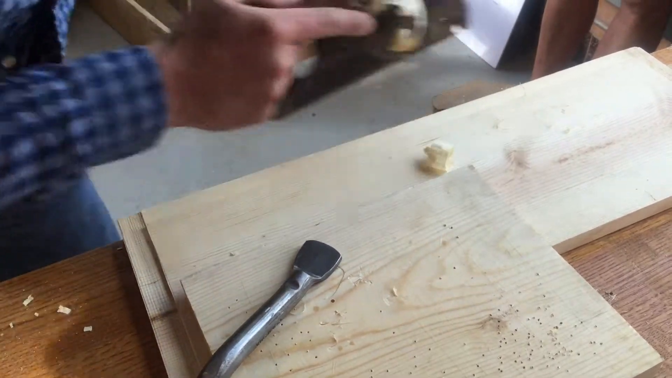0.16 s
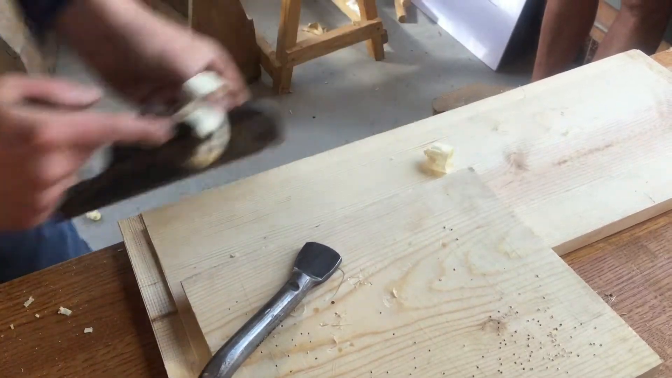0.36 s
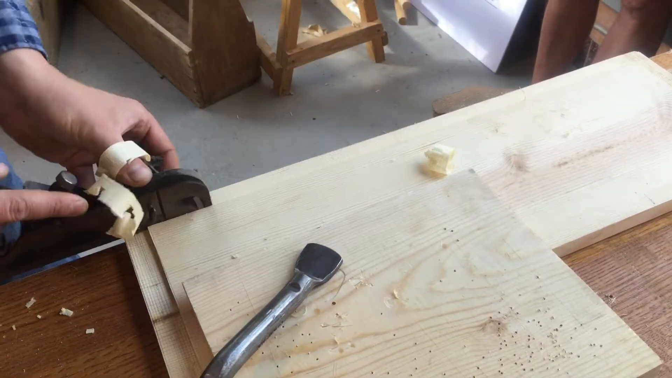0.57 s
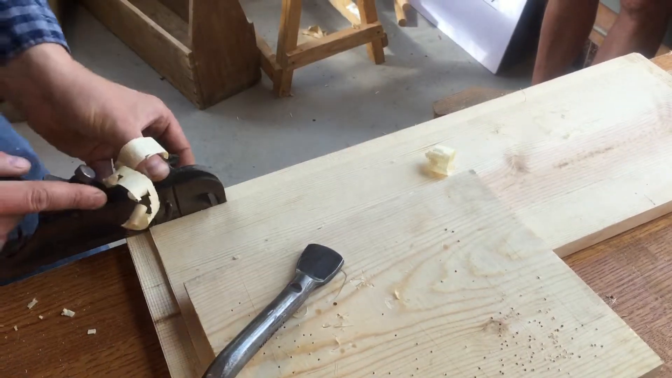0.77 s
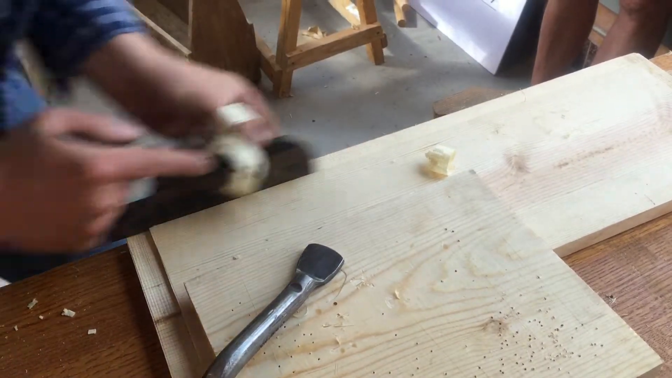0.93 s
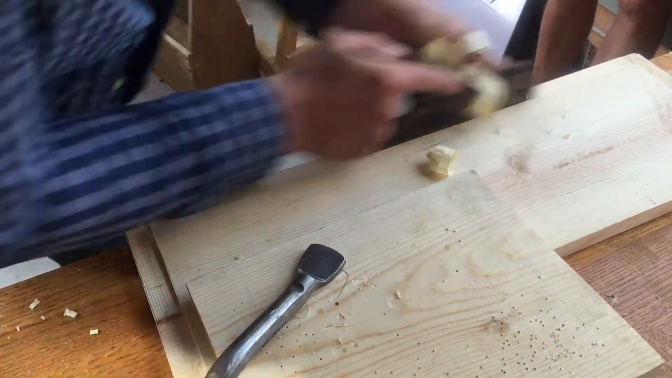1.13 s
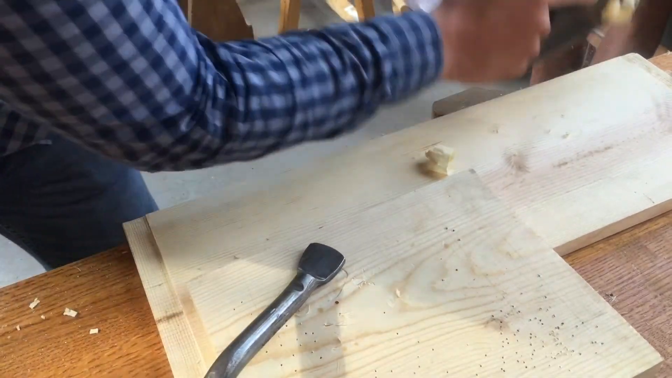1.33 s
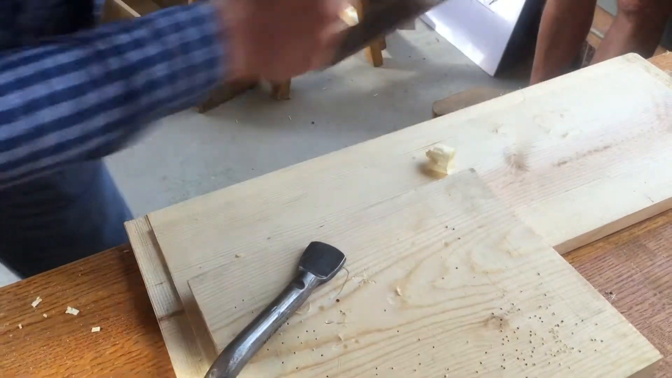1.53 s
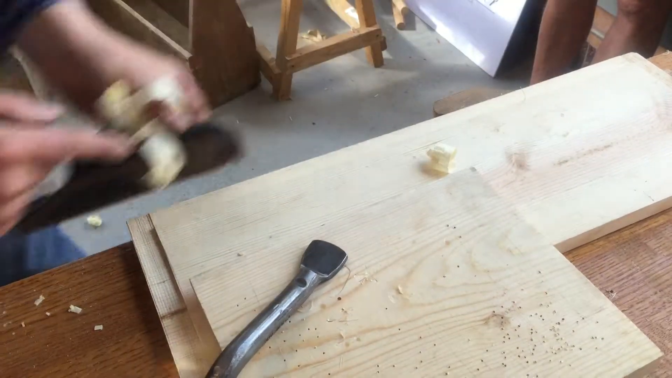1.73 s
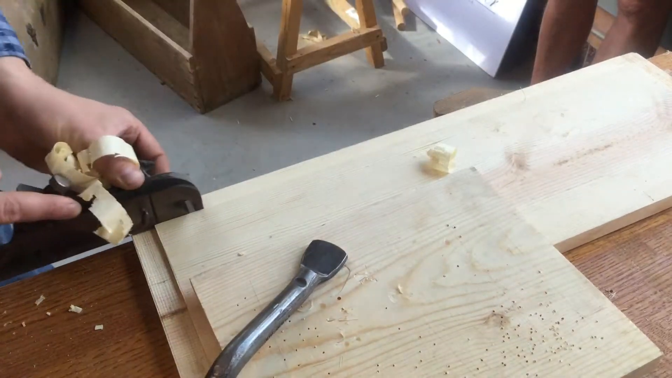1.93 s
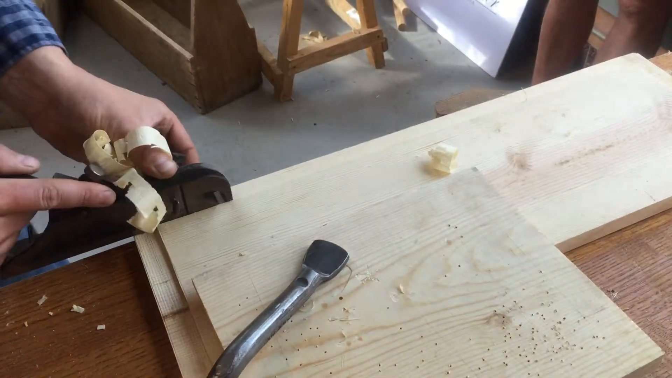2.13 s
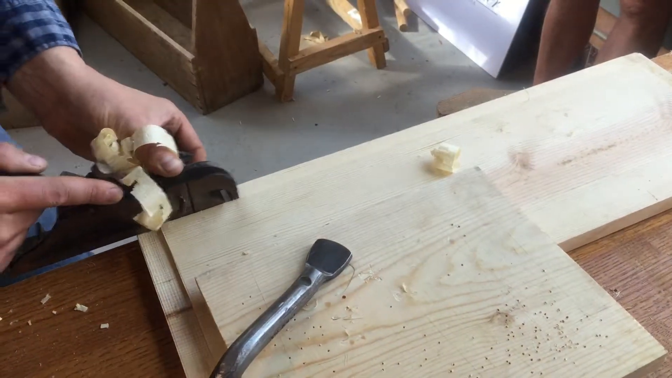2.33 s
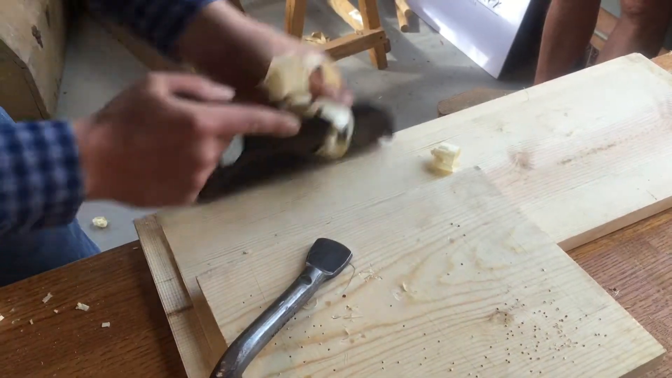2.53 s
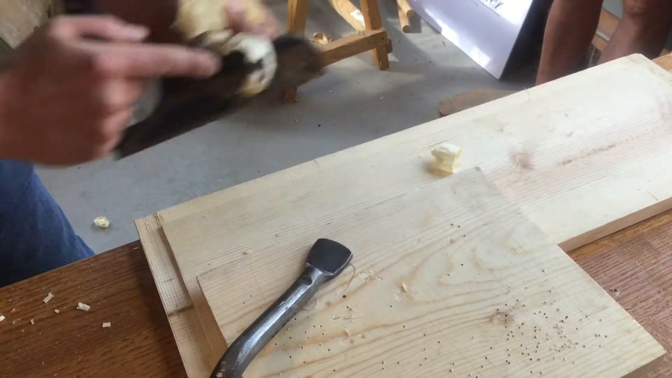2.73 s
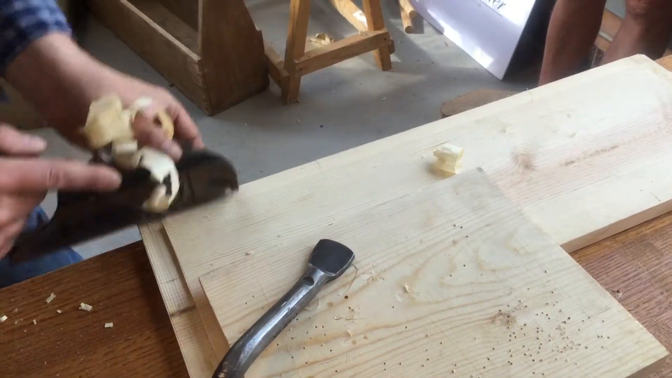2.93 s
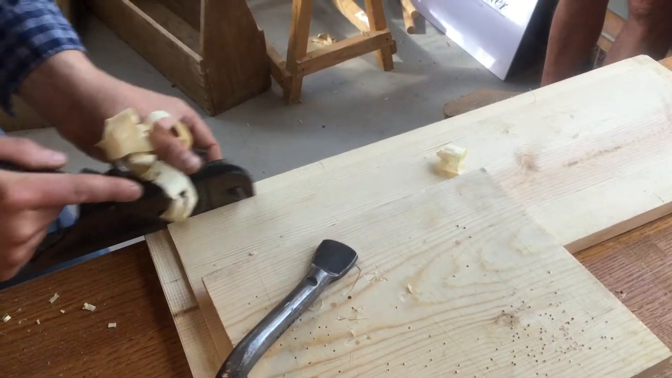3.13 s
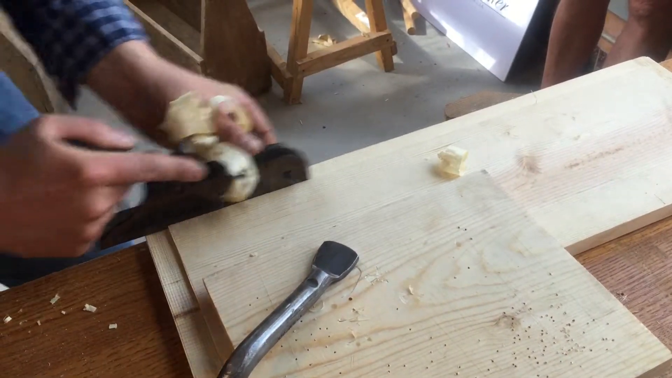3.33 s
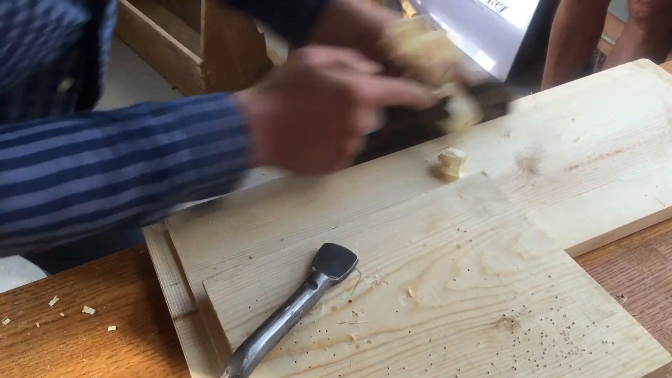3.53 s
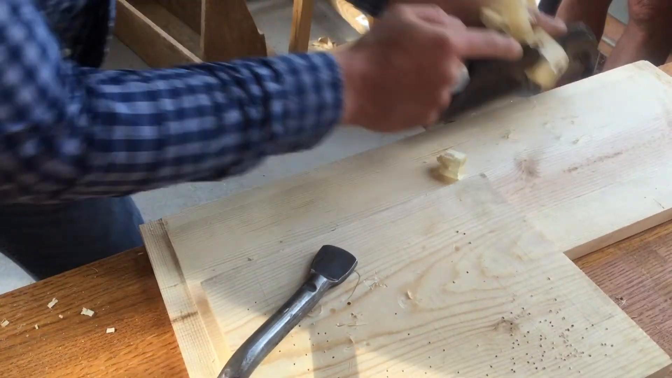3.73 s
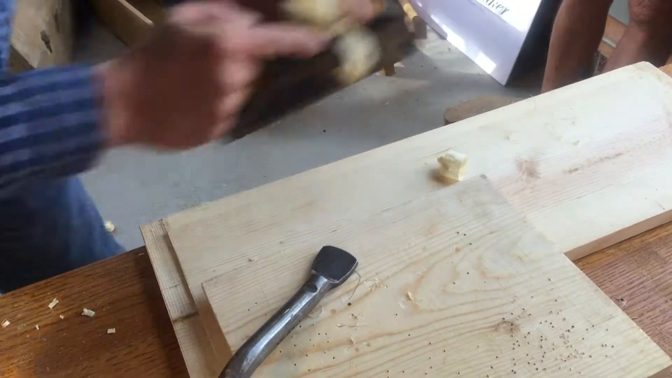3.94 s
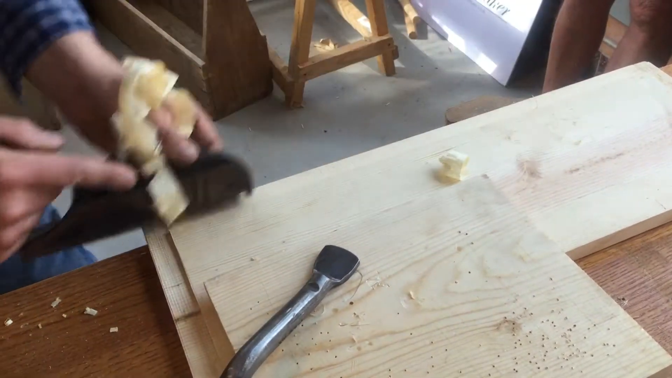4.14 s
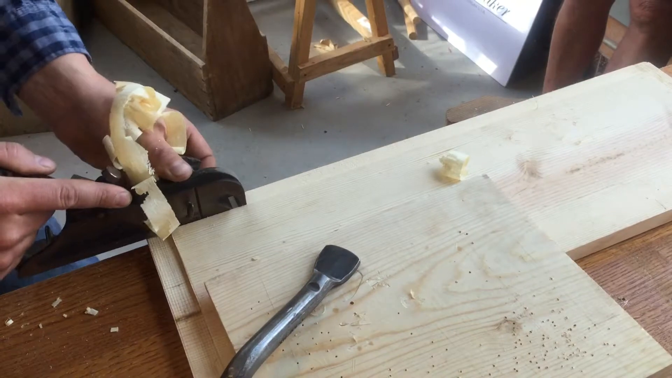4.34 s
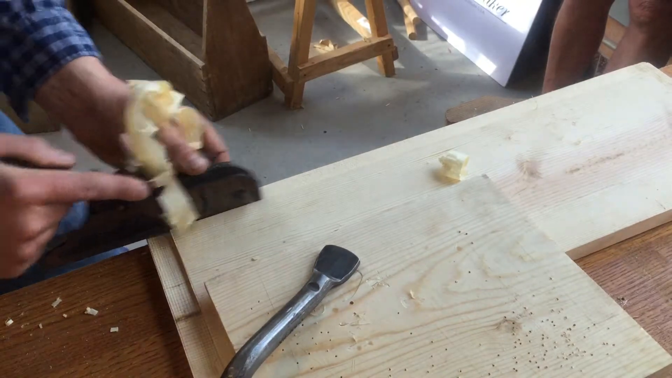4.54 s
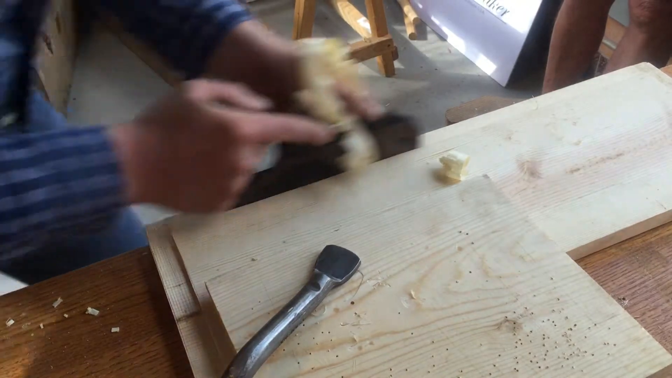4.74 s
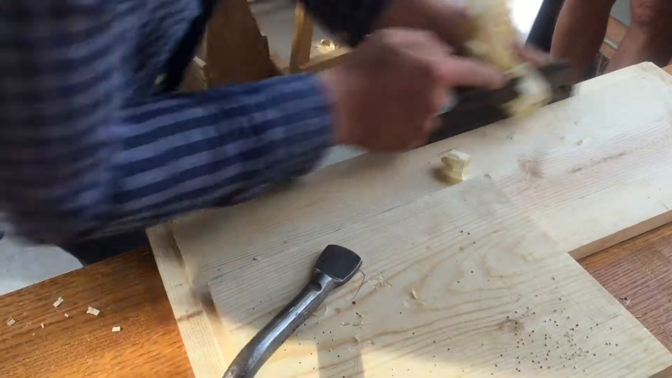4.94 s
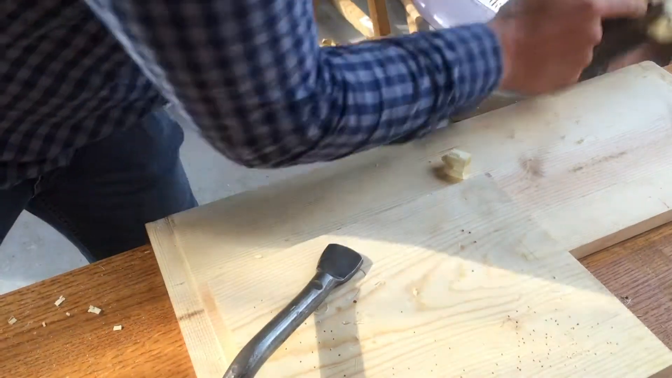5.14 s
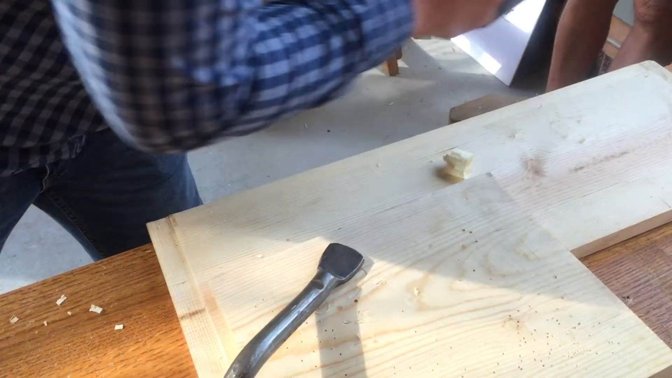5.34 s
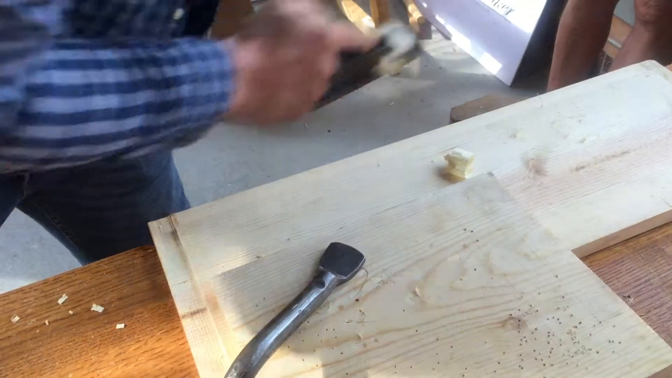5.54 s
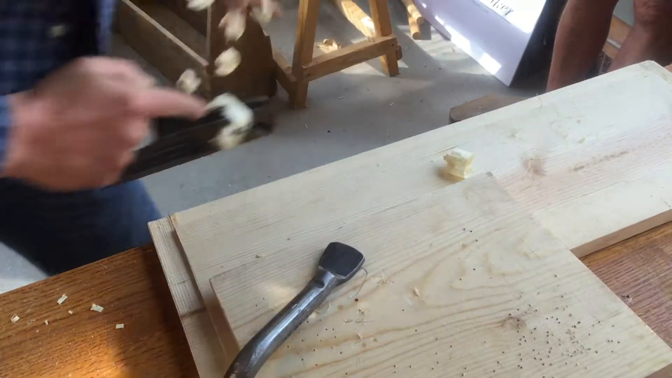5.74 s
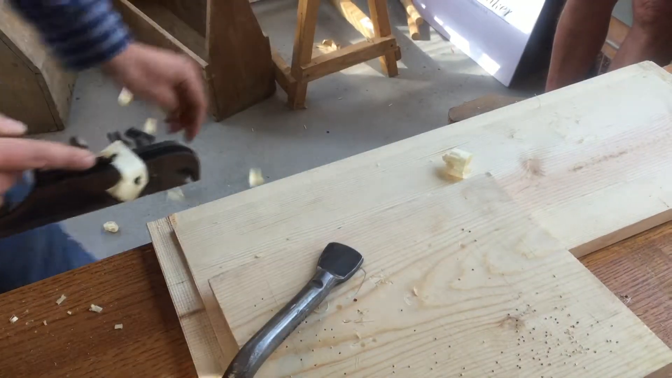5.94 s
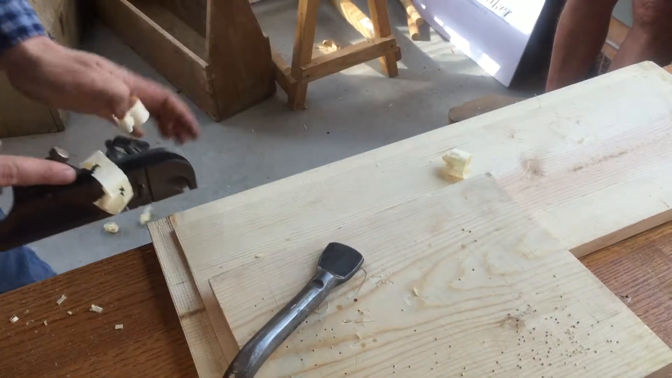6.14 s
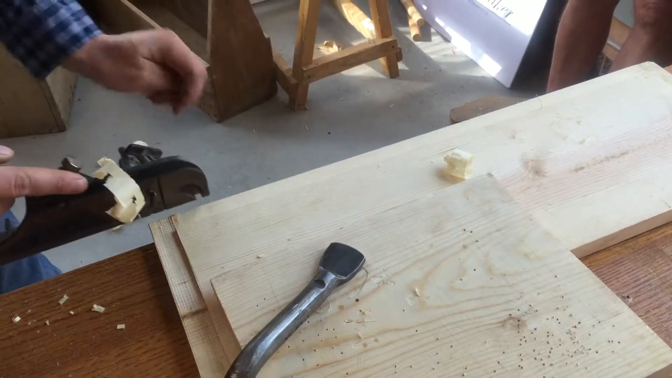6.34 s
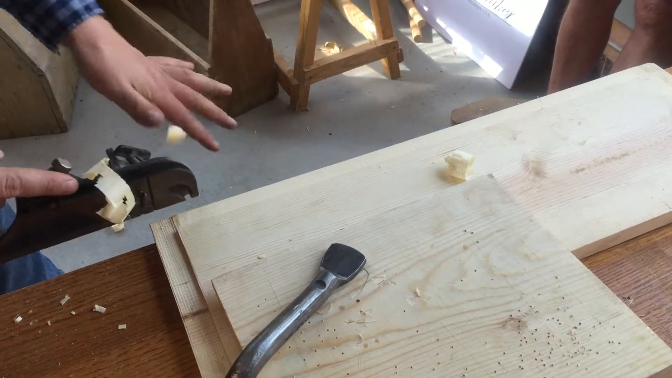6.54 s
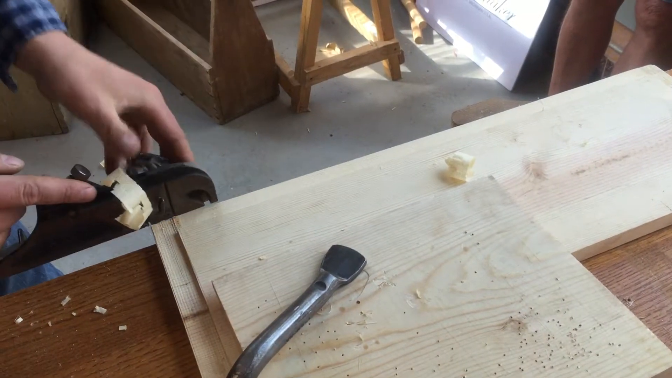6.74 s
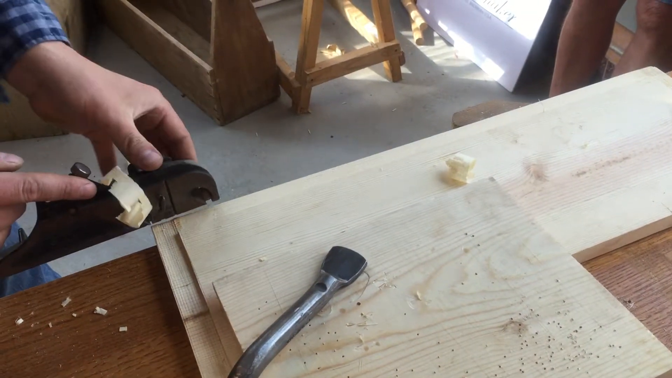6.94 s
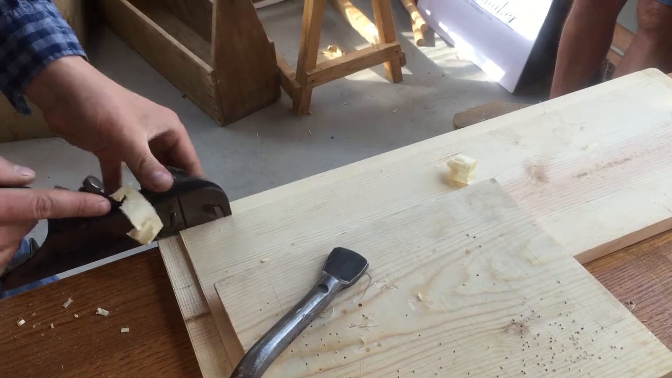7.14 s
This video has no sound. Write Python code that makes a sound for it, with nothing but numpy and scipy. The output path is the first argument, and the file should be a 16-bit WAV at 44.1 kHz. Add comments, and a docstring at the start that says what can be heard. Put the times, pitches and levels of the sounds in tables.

```python
"""A hand plane takes five shavings off a board's edge in a large workshop; taps, thuds, rustles and echoes.
Cutting: random fibre snaps excite resonances of board, plane and blade, plus hiss and drag.
Taps: a short clack, decaying board and bench modes and a click. Thuds: low cycles of sinking pitch.
Rustles and a far scuff: clumped, coloured clicks. Cracks: short high cycles with a noise tick.
Behind them: coloured noise, rumble and faint tones; sparse random echoes form the room."""
import sys
import numpy as np
from scipy import signal
from scipy.fft import rfft, irfft
from scipy.io import wavfile
from scipy.ndimage import uniform_filter1d

SR = 44100
rng = np.random.default_rng(int(sys.argv[2]) if len(sys.argv) > 2 else 0)


def inscribe(sig):
    """Save sig as 16-bit PCM at rate SR to the path in sys.argv[1].

    A 1-D sig is mono; a 2-D sig holds one channel per row.
    Samples are clipped to [-1, 1] before scaling.
    """
    pcm = np.round(np.clip(np.atleast_2d(sig).T, -1, 1) * 32767)
    wavfile.write(sys.argv[1], SR, pcm.astype(np.int16))


N = 317079  # samples


def gain_of(db):
    """dB to gain."""
    return 10 ** (np.asarray(db) / 20)


def evened(x):
    """Scales to rms 1."""
    return x / np.sqrt(np.mean(x ** 2) + 1e-20)


def read(points, hz):
    """Reads a spectrum table on a log-frequency axis."""
    f, value = np.transpose(points)
    return np.interp(np.log(hz + 1), np.log(f + 1), value)


def add(mix, start_s, sound):
    """Mixes a sound in at start_s, cut at the end of the mix."""
    part = mix[round(start_s * SR):][:len(sound)]
    part += sound[:len(part)]


def colour(x, points):
    """Shapes x by a spectrum, rms 1."""
    hz = np.fft.rfftfreq(len(x), 1 / SR)
    return evened(irfft(rfft(x) * gain_of(read(points, hz)), len(x)))


def resonate(x, modes):
    """Passes x through (f/Hz, width/Hz, level/dB) resonances of alternating sign, rms 1."""
    hz = np.fft.rfftfreq(len(x), 1 / SR)
    response = 0
    for k, (f, width, db) in enumerate(modes):
        band = width * hz / (f ** 2 - hz ** 2 + 1j * width * hz)
        response = response + (-1) ** k * gain_of(db) * band
    return evened(irfft(rfft(x) * response, len(x)))


def snaps(count, per_s, spread_db):
    """Random clicks of either sign; spread_db scales an exponential scatter of their levels."""
    level_db = spread_db * np.minimum(rng.exponential(1, count), 4)
    size = gain_of(level_db) * rng.choice([-1, 1], count)
    return size * (rng.random(count) < per_s / SR)


def shifting(x, depth_db, bins, frames):
    """Resonances swell and fade in time-frequency patches as the contact travels; rms 1."""
    z = signal.stft(x, nperseg=256, noverlap=192)[2]
    patches = uniform_filter1d(rng.standard_normal(z.shape), bins, 0)
    patches = uniform_filter1d(patches, frames, 1)
    shaped = z * gain_of(depth_db * evened(patches))
    return evened(signal.istft(shaped, nperseg=256, noverlap=192)[1][:len(x)])


def ring(modes, tilt_db, detune, t):
    """Decaying sines, peak 1; each mode is detuned a little at random each time."""
    out = 0
    for hz, db, t60_s in modes:
        level = gain_of(db + tilt_db(hz) - 60 * t / t60_s)
        out = out + level * np.sin(2 * np.pi * hz * rng.normal(1, detune) * t)
    return out / abs(out).max()


def clack(hz, cycles, t):
    """A few cycles that swell and die away."""
    u = 3 * t * hz / cycles
    return (u * np.exp(1 - u)) ** 2 * np.sin(2 * np.pi * hz * t)


def rubbed(length_s, db, spectrum, per_s, spread_db, clump_db):
    """Clicks of friction in clumps that swell and fade."""
    count = round(length_s * SR)
    clicks = snaps(count, per_s, spread_db)
    clumped = shifting(clicks, depth_db=clump_db, bins=12, frames=8)
    # power under 1: swells faster than it fades
    swell = np.sin(np.pi * (np.arange(count) / count) ** 0.85) ** 1.6
    return gain_of(db) * colour(clumped, spectrum) * swell


def air():
    """Steady room hush from coloured noise, a lumpy resonant rumble and faint blurred tones."""
    # hush spectrum: f/Hz, level/dB
    hush_spectrum = [(18, -46.5), (30, -34), (73, 6.5), (328, -23.5), (364, -20.5), (512, -25.5),
                     (721, -22), (780, -23), (1460, -20.5), (1760, -22.5), (2010, -24.5), (6380, -32.5),
                     (16000, -40.5)]
    # faint tones: f/Hz, rms level/dB
    tones = [(362, -75.5), (600, -75), (720, -77.5), (1800, -76.5)]
    hush_db = -64
    slow = uniform_filter1d(uniform_filter1d(rng.standard_normal(N), 2000), 2000)
    lumps = gain_of(5 * evened(slow))
    rumble = resonate(lumps * rng.standard_normal(N), [(85, 48, 0)])
    rumble = resonate(rumble, [(85.3, 67, 0)])
    hum = sum(gain_of(db) * resonate(rng.standard_normal(N), [(hz, 14, 0)]) for hz, db in tones)
    hush = colour(rng.standard_normal(N), hush_spectrum)
    return gain_of(hush_db) * (hush + 1.6 * rumble) + hum


def room(x):
    """Sparse echoes of random sign, each band dying at its own speed."""
    # reverberation: f/Hz, t60/s
    decay = [(100, 2.2), (300, 3.1), (800, 1.92), (2000, 1.284), (5000, 0.78), (9000, 0.15), (15000, 0.15)]
    echoes = np.zeros(2 * SR)
    at = np.arange(300, 2 * SR - 20, 20)  # one echo per 20 samples
    echoes[at + rng.integers(0, 20, len(at))] = rng.choice([-1., 1.], len(at))
    hz, t, z = signal.stft(echoes, SR, nperseg=256)
    fading = gain_of(-60 * t / read(decay, hz)[:, None])
    tail = signal.istft(z * fading, SR, nperseg=256)[1]
    # bench top and near walls answer first and strongest
    tail *= 1 + 2.24 * np.exp(-np.arange(len(tail)) / SR / 0.013)
    return signal.fftconvolve(x, tail / np.linalg.norm(tail))[:N]


def scuff(start_s, length_s, db):
    """Dense friction clicks, dull in colour, farther off in the room."""
    # scuff spectrum: f/Hz, level/dB
    spectrum = [(120, -47.5), (200, -12), (473, -3), (682, -8.5), (1190, -9), (1950, -10), (2110, -7.5),
                (3100, -17.5), (9000, -38), (11700, -67), (19800, -120)]
    return start_s, rubbed(length_s, db, spectrum, per_s=17000, spread_db=1.5, clump_db=1.5)


def thud(start_s, db, hz):
    """Dull thud through floor and bench: a few low cycles, soft start, sinking pitch."""
    decay_cycles, sag = 0.87, 0.45  # sag: share of the pitch lost
    t = np.arange(SR // 4) / SR
    pitch_hz = hz * (1 - sag * (1 - np.exp(-t / 0.015)))
    turns = np.cumsum(pitch_hz) / SR
    envelope = np.exp(-turns / decay_cycles) * (1 - np.exp(-t / 0.0023))
    return start_s, 2 * gain_of(db) * np.sin(2 * np.pi * turns) * envelope


def rustle(start_s, length_s, db):
    """Papery friction clicks, as of shavings rubbed and crushed; also the bright rasp of some taps."""
    # papery spectrum: f/Hz, level/dB
    spectrum = [(940, -31.5), (1600, -10), (2310, 0), (2770, -19.5), (4230, -7), (4840, -9), (6850, -10),
                (7840, -22), (14500, -16), (16000, -25)]
    return start_s, rubbed(length_s, db, spectrum, per_s=3500, spread_db=4.3, clump_db=4)


def crack(start_s, db, hz):
    """A single shaving snaps: short dry cycles with a broad tick."""
    t = np.arange(400) / SR
    tick = 0.15 * rng.standard_normal(len(t)) * np.exp(-t / 0.001)
    return start_s, gain_of(db) * (clack(hz, 3, t) + tick)


def tap(start_s, db, hz, cycles, click_db, bench_db):
    """A short clack; the board rings near its pitch, unevenly, and the heavy bench follows slowly."""
    # struck board, before tilt: f/Hz, level/dB
    board_modes = [(230, -25), (275, 10), (345, 8), (430, -1.5), (520, 10), (600, 6), (673, -14.5),
                   (760, 15), (856, 5.5), (1000, -3.5), (1195, 11), (1400, 7), (1650, 6), (1895, 8.5),
                   (2150, 7.5), (2444, 1.5), (2800, -20.5), (3400, -16), (4377, -17.5)]
    # bench, before random tilt: f/Hz, level/dB, t60/s
    bench_modes = [(58.6, -10.5, 0.1), (74.8, -6.5, 0.36), (82.3, -4, 0.5), (95.6, -6, 0.38),
                   (124.9, -6, 0.33), (139.8, -18, 0.28), (185, -10, 0.12)]
    # iron on wood: f/Hz, level/dB
    click_spectrum = [(1500, -22), (3000, 1), (6000, -6), (9000, -29), (15000, -30)]
    board_db = -1.5  # re clack
    t = np.arange(SR) / SR
    modes = [(f, level_db, 0.8 / np.sqrt(f)) for f, level_db in board_modes]  # high modes die sooner
    board = ring(modes, lambda f: -4.5 * abs(np.log2(f / hz)), 0.067, t)
    # many small contacts
    t_contact = t[:1500]
    chatter = rng.standard_normal(1500) * np.exp(-t_contact / 0.0058) * (1 - np.exp(-t_contact / 0.0012))
    board = signal.oaconvolve(board, chatter)[:SR]
    board /= abs(board).max()
    click = colour(rng.standard_normal(SR), click_spectrum)
    click *= np.exp(-t / 0.003) * (1 - np.exp(-t / 0.0029))
    bench = ring(bench_modes, lambda f: 2.6 * rng.standard_normal(), 0.0092, t)
    bench *= 1 - np.exp(-t / 0.012)
    rest = gain_of(board_db) * board + gain_of(click_db) * click + gain_of(bench_db) * bench
    return start_s, gain_of(db) * (clack(hz, cycles, t) + rest)


def bite_db(t):
    """Before each catch the cut thins; it regains with a jolt, and the blade level shifts for a while."""
    # edge slips, before each part's share: catch t/s, loss/dB, fading/s, regaining/s, jolt/dB, blade ring/dB
    slips = [(0.034, -10, 0.028, 0.028, -2.5, 1), (1.185, -12.5, 0.06, 0.0054, -2, -1),
             (1.243, -8.5, 0.028, 0.047, 7.5, 1.5), (3.538, -11.5, 0.087, 0.0056, 1.5, 4.5),
             (3.745, -2.5, 0.15, 0.011, 3.5, -2.5), (4.687, -1.5, 0.011, 0.0093, 3, 5),
             (4.755, -9, 0.057, 0.003, 8, 2.5), (4.83, -1, 0.034, 0.006, 2, 1.5),
             (4.994, -1.5, 0.011, 0.017, 0, 1), (5.072, -6.5, 0.032, 0.0066, 3, 8.5)]
    jolt_decay_s, blade_ring_s = 0.034, 0.09
    cut_db, blade_db = np.zeros(len(t)), np.zeros(len(t))
    for catch_s, loss_db, fading_s, regain_s, jolt_db, ring_db in slips:
        after_s = np.maximum(t - catch_s, 0)
        caught = np.minimum(after_s / regain_s, 1)
        cut_db += np.interp(t, [catch_s - fading_s, catch_s, catch_s + regain_s], [0, loss_db, 0])
        cut_db += jolt_db * caught * np.exp(-after_s / jolt_decay_s)
        blade_db += ring_db * caught * np.exp(-(after_s / blade_ring_s) ** 2)
    return cut_db, blade_db


def stroke(start_s, end_s, rise_s, fall_s, *levels_db):
    """Fibres part one after another at the edge and shake plane, board and blade; the plane swells last."""
    # board edge: f/Hz, width/Hz, level/dB
    board_modes = [(670.4, 82, 6.5), (937, 149, 11), (1216, 102, 10.5), (1435, 238, 5.5)]
    # plane body: f/Hz, width/Hz, level/dB
    plane_modes = [(1896, 244, -1), (2252, 260, -2.5), (2578, 153, -3)]
    # blade: f/Hz, width/Hz, level/dB
    blade_modes = [(3040, 790, 4), (3644, 247, 12), (4283, 300, 9.5), (4754, 48, 13.5), (4815, 660, -1),
                   (5846, 717, 9.5), (6160, 450, 0)]
    # curling shaving: f/Hz, level/dB
    hiss_spectrum = [(3820, -22.5), (6500, -7.5), (8210, -7), (9400, -6), (11900, -9.5), (13800, -4.5),
                     (16000, -16)]
    # the sole drags the whole board: f/Hz, width/Hz, level/dB
    drag_modes = [(274, 91, -3), (400.7, 70, -2.5), (586, 123, -3.5)]
    # share of a slip felt by board, plane, blade, hiss, drag
    slip_shares = (1.2, 0.8, 0.25, 0.2, 0.5)
    rise_powers = 2.1, 3.2, 2.1, 2.1, 2.1  # same order
    t = np.arange(start_s, end_s, 1 / SR)
    early_late_db = np.reshape(levels_db, (-1, 2))
    effort_db, lean_db, blade_db, hiss_db, drag_db = (
        np.interp(t, [start_s, end_s], pair) for pair in early_late_db)
    push = np.sin(np.pi / 2 * np.minimum((t - start_s) / rise_s, 1))
    push *= np.clip((end_s - t) / fall_s, 0, 1)
    cut_db, ring_db = bite_db(t)
    lean_db = lean_db + 1.3 * np.maximum(cut_db, 0)  # a jolt shakes the plane more than the board
    # harder and softer wood
    grain = gain_of(0.57 * evened(uniform_filter1d(rng.standard_normal(len(t)), 250)))
    torn = snaps(len(t), per_s=6000, spread_db=0)
    fibres = shifting(torn, depth_db=3.5, bins=3, frames=23)
    parts = (resonate(fibres, board_modes), resonate(fibres, plane_modes), resonate(fibres, blade_modes),
             colour(fibres + evened(torn), hiss_spectrum), resonate(fibres, drag_modes))
    parts_db = -3.5 - lean_db / 2, -3.5 + lean_db / 2, blade_db + ring_db, hiss_db, drag_db
    sound = np.zeros(len(t))
    for part, db, share, power in zip(parts, parts_db, slip_shares, rise_powers):
        sound += push ** power * gain_of(db + share * cut_db) * part
    return start_s, gain_of(effort_db) * grain * sound


def scene():
    """Near sounds and a far scuff, their echoes and the hush."""
    # hands on shavings; the row at 4.28 is the bright rasp of the taps: t/s, length/s, level/dB
    rustles = [(1.853, 0.058, -60), (1.916, 0.078, -47.5), (2.082, 0.07, -60), (2.155, 0.12, -56),
               (2.206, 0.068, -57), (4.28, 0.03, -44.5), (5.433, 0.12, -54), (5.5, 0.14, -53.5),
               (5.596, 0.18, -54), (6.044, 0.2, -62), (6.37, 0.076, -72), (6.455, 0.054, -56)]
    # through floor and bench, before a doubling: t/s, level/dB, starting f/Hz
    thuds = [(0.37, -33.5, 267), (1.559, -31.5, 186), (1.699, -43, 115), (3.278, -21.5, 252),
             (5.013, -14.5, 304), (5.042, -21, 190), (5.27, -30, 162), (5.372, -27.5, 198),
             (5.423, -29.5, 166.6), (5.46, -35, 120), (5.685, -32, 138), (6.473, -54, 73),
             (6.916, -38.5, 89.5), (7.01, -46, 102), (7.17, -56, 133.4)]
    # single shavings: t/s, level/dB, f/Hz
    cracks = [(0.9158, -46, 8500), (5.4765, -48, 4510), (5.5238, -48, 6440), (5.559, -37, 2260),
              (5.6421, -37, 5970), (5.663, -50, 9500), (5.6966, -43, 7200), (5.7064, -50, 4550)]
    # plane meets or leaves board, or the bench bounces:
    # t/s, clack level/dB, clack f/Hz, clack length/cycles, click/dB and bench/dB re clack
    taps = [(0.5995, -11, 1430, 6.5, -36, -24), (0.606, -8, 514, 2.25, -36, -7.5),
            (0.7318, -11.5, 845, 5.3, -32.5, -25), (1.904, -12, 313, 1.96, -53, -6.5),
            (1.919, -16, 357, 0.82, -33, -16), (1.952, -23, 400, 4.5, -36, -23.5),
            (1.9735, -9, 1470, 5.5, -53.5, -31.5), (1.9755, -9, 747, 2.3, -16.5, -26),
            (2.164, -26.5, 306, 6.6, -42.5, -12.5), (2.203, -9, 770, 2.9, -38, -12),
            (2.617, -19, 317, 5, -12.5, -7.5), (3.077, -14.5, 362.6, 2.9, -24, -18.5),
            (3.104, -6.5, 637, 1.7, -30, -6.5), (4.266, -14.5, 1170, 4.6, -11, -20),
            (4.285, -10, 340, 2.16, -15, -4), (4.298, -17, 300, 1.8, -30, -10),
            (4.332, -26, 200, 1.8, -40, 13), (6.817, -38, 294, 4.7, -41, 8.5),
            (6.849, -43, 302, 3.9, -39.5, 6)]
    # pushes of the plane: start t/s, end t/s, rise/s, fall/s, then early and late each:
    # effort/dB, lean from board to plane/dB, blade/dB, hiss/dB, drag/dB
    strokes = [(0.0, 0.134, 0.0014, 0.024, -18, -17, 2.5, -5, -14, -14, -21, -25.5, -13, -13),
               (0.919, 1.344, 0.1, 0.021, -18.5, -21, 0, 3, -13, -9.5, -23.5, -21, -17, -25),
               (2.426, 2.648, 0.1, 0.034, -21.5, -20, -3, -2, -10, -12, -26, -21, -12, -7),
               (3.243, 3.445, 0.034, 0.073, -32.5, -36, 2, -11, -18.5, -9, -28.5, -18.5, -7, -2),
               (3.38, 3.81, 0.1, 0.067, -18, -22, 3, -8, -14, -13.5, -23, -22, -11, -8),
               (4.58, 5.178, 0.15, 0.012, -24.5, -25, 4, -3.5, -15, -13, -20.5, -24.5, -17, -11)]
    near_send_db, far_send_db = -14.5, -6
    near, far = np.zeros(N), np.zeros(N)
    add(far, *scuff(start_s=6.04, length_s=0.22, db=-51.5))
    layers = (thud, thuds), (rustle, rustles), (crack, cracks), (tap, taps), (stroke, strokes)
    for source, table in layers:
        for row in table:
            add(near, *source(*row))
    echoes = room(gain_of(near_send_db) * near + gain_of(far_send_db) * far)
    return (near + far + echoes + air())[None]


def record(dry):
    """Microphone loses deep bass; gain control holds loud sounds down, lets echoes swell back; band limit."""
    threshold_db, recovery_db_per_s, band_edge_hz = -21.5, 270, 15800
    heard = signal.sosfilt(signal.butter(4, 54, "high", fs=SR, output="sos"), dry)
    power_db = 10 * np.log10(abs(uniform_filter1d(heard[0] ** 2, 400)) + 1e-12)
    fall_db = np.arange(N) * recovery_db_per_s / SR
    peak_db = np.maximum.accumulate(power_db + fall_db) - fall_db  # falls at the recovery rate
    over_db = np.maximum(peak_db - threshold_db, 0)
    held = heard / gain_of(0.25 * uniform_filter1d(over_db, 200))
    lowpass = signal.firwin(511, band_edge_hz, window=("kaiser", 9), fs=SR)
    return signal.oaconvolve(held, lowpass[None], "same")


dry = scene()
out = record(dry)
inscribe(out)
```